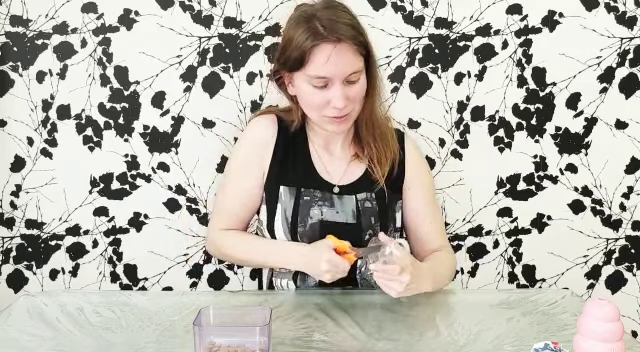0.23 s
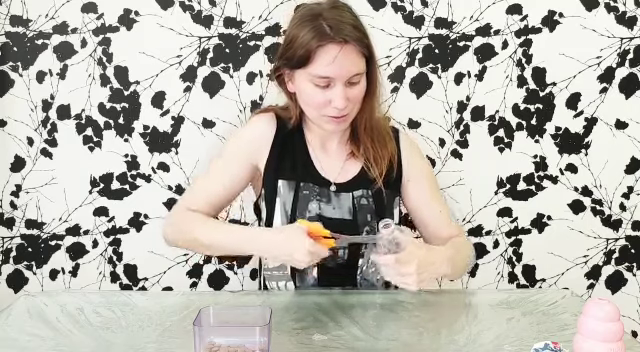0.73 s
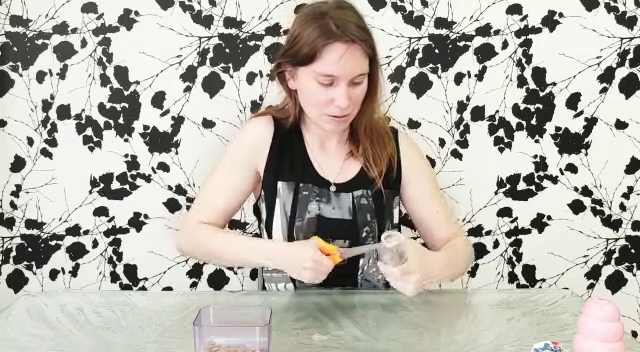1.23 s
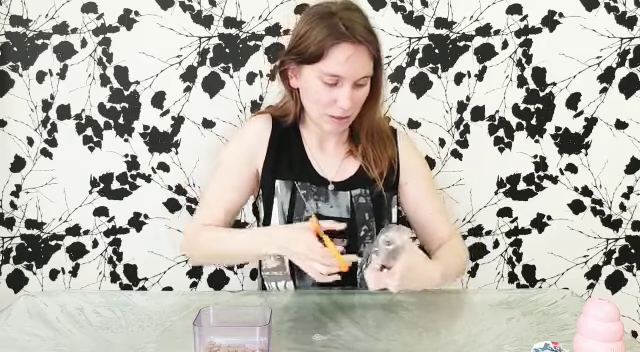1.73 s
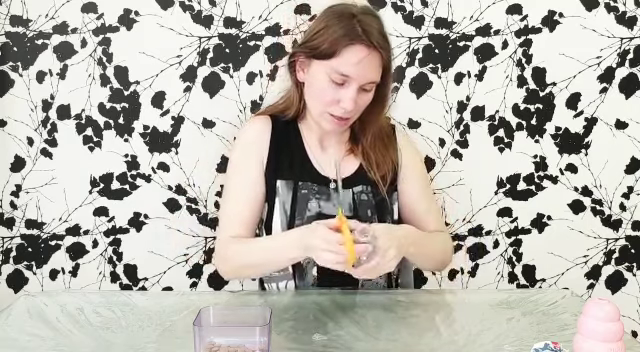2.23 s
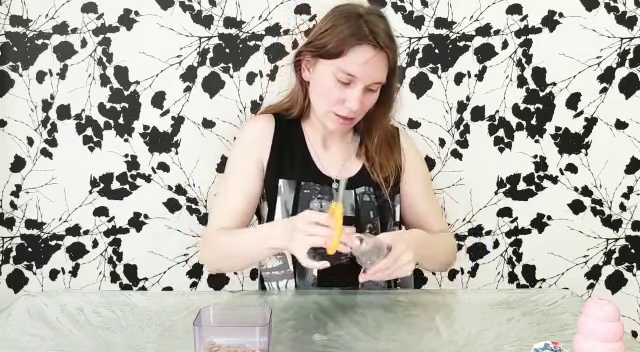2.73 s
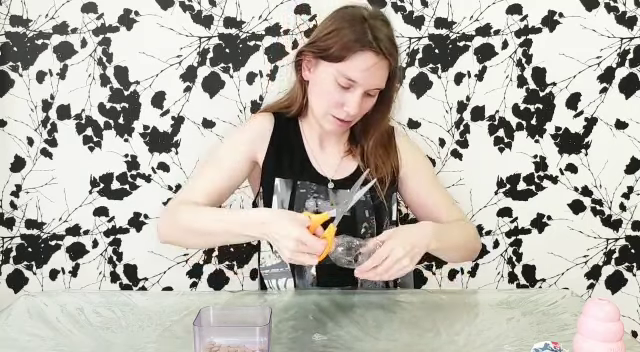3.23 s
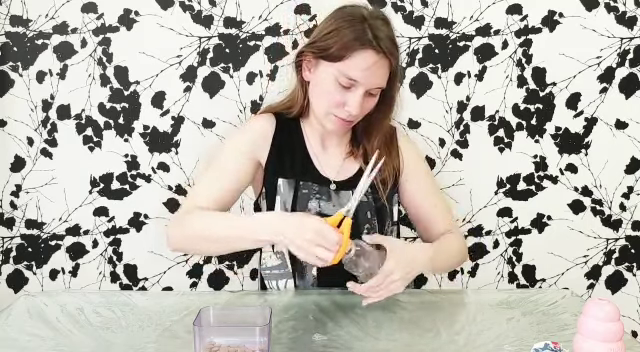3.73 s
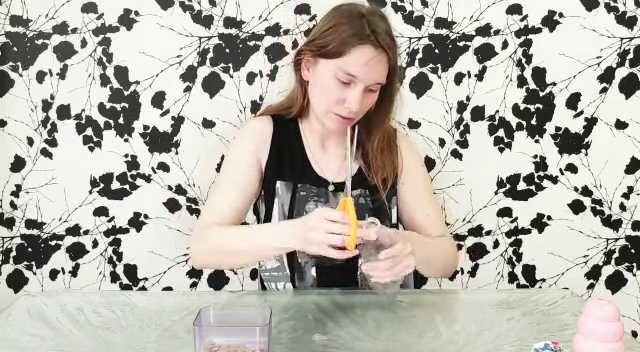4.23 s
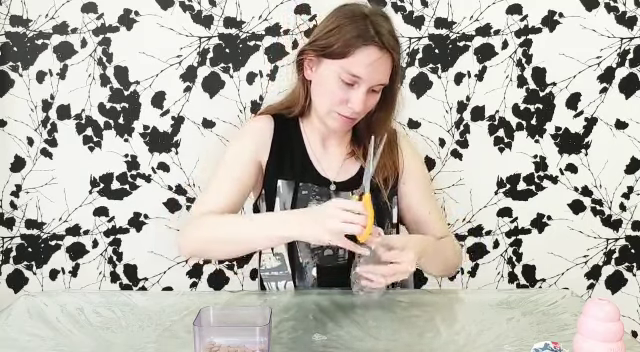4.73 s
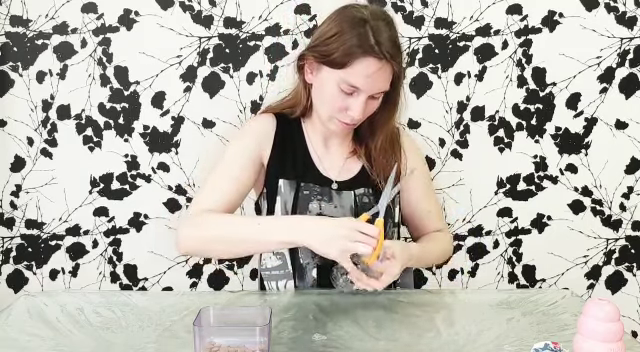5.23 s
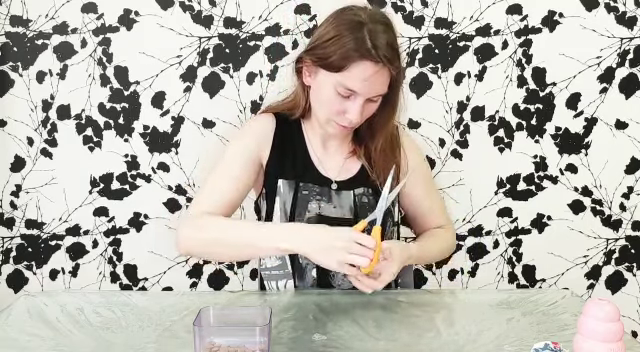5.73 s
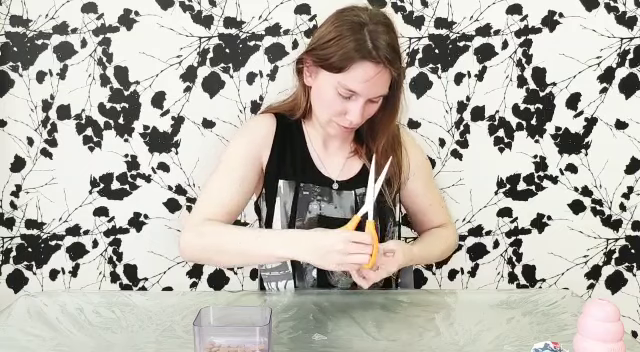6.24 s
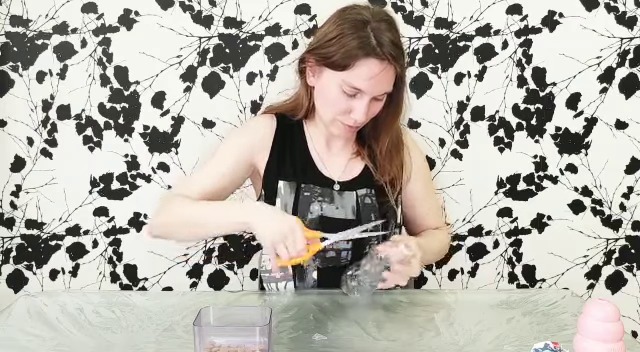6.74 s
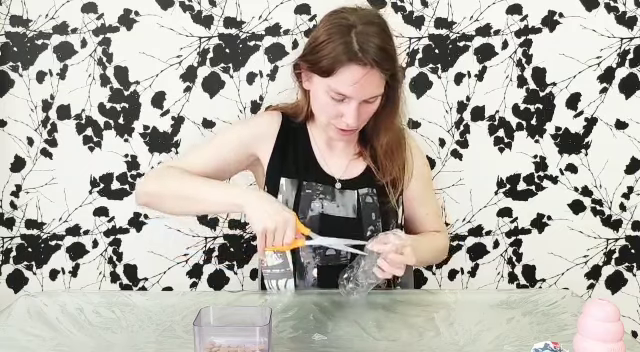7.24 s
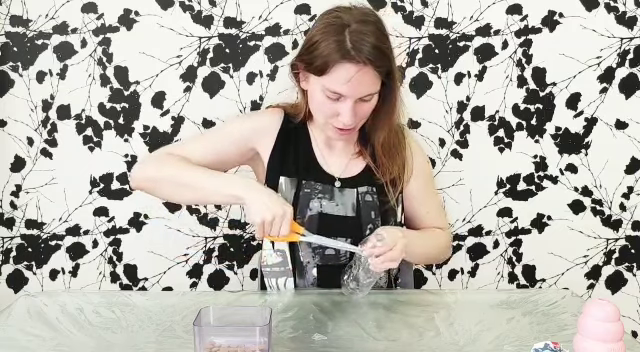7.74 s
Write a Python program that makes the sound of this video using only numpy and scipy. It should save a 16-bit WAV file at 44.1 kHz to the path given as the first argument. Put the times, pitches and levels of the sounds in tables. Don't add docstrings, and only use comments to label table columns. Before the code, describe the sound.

In a bare, hard room with faint air noise and low mains hum, scissors cut a thin plastic bottle close to a bright stereo microphone. From 0 to 1 second, fine crinkles and small dents lead into sharp snaps, with a strong panel click at 0.8. A hollow pop comes near 1.07, a hard snip at 1.5, then a lighter, quieter stretch. From 2.3 to 2.7 a dense cluster of cracks, splinters and pops bursts out. More snips follow at 2.95 and 3.3, then hollow buckling and short groaning slips around 3.4 to 3.6. Separate cracks sound near 4.1, 4.5 and 4.8, a deeper pop at 5.03, and snaps at 5.35 and 5.55. Crackling continues from 6 to 6.6, eases, then resumes at 7.3. A very loud, direct plastic pop hits at 7.5, followed by final snaps until 8. Each crack rings for about half a second.

```python
import sys
import numpy as np
from scipy import signal
from scipy.fft import rfft, irfft
from scipy.io import wavfile

SR = 44100
rng = np.random.default_rng(int(sys.argv[2]) if len(sys.argv) > 2 else 0)


def to_wav(sig):
    pcm = np.clip(np.atleast_2d(sig), -1, 1) * 32767
    pcm = np.round(pcm).astype(np.int16)
    wavfile.write(sys.argv[1], SR, pcm.T)


def gain_from_decibels(decibels):
    exponent = np.asarray(decibels, float) / 20
    return 10 ** exponent


N = 352359


def evened(x):
    return x / np.sqrt(np.mean(x ** 2) + 1e-20)


def peaked(x, db):
    return gain_from_decibels(db) * x / abs(x).max()


def read(points, hz):
    f, value = np.transpose(points)
    return np.interp(np.log(hz + 1), np.log(f + 1), value)


def add(mix, start_s, sound):
    part = mix[round(start_s * SR):][:len(sound)]
    part += sound[:len(part)]


def band(x, lo_hz, hi_hz):
    edges_hz = [lo_hz, min(hi_hz, SR / 2 - 500)]
    return signal.sosfilt(signal.butter(2, edges_hz, "bandpass", fs=SR, output="sos"), x)


def noise_pair(gain, same):
    a, b, c, d = rng.standard_normal(gain.shape[::-1] + (4,)).T
    same = np.clip(same, -1, 1)[:, None]
    left = a + 1j * b
    right = same * left + np.sqrt(1 - same ** 2) * (c + 1j * d)
    return signal.istft(np.array([left, right]) * gain, nperseg=512, noverlap=384)[1]


# pitch_hz, density_db (per Hz)
AIR = [(12, -14), (30, 4), (70, -4), (225, -9), (430, -4.5), (516, -31), (891, -8), (1220, -15.5),
       (2660, -21), (4830, -52), (7320, -19), (10000, -34), (13000, -31), (22000, -120)]
# pitch_hz, level_db, phase_rad
HUM = [
    (99.94, -64, 3.73),
    (98.5, -69, 4.39),
    (149.94, -71, 4.17),
    (199.86, -64, -.54),
]
# pitch_hz, likeness (0-1)
ROOM_SAME = [(60, 0.093), (180, 0.83), (550, 0.42), (1650, 0.056), (4970, 0.017), (15000, 0.015)]


def background():
    hz = np.fft.rfftfreq(512, 1 / SR)
    t = np.arange(N) / SR
    air_gain = gain_from_decibels(read(AIR, hz))[:, None] * np.ones(N // 128 + 5)
    air = noise_pair(air_gain, read(ROOM_SAME, hz))[:, :N]
    hum = sum(np.sqrt(2) * gain_from_decibels(db) * np.sin(2 * np.pi * f * t + phase) for f, db, phase in HUM)
    return gain_from_decibels(-51) * evened(air) + gain_from_decibels([[1.5], [-1.5]]) * hum


# start_s, level_db
CREASES = [(0, -33), (.7, -59), (2.0, -41.5), (2.28, -60), (2.33, -27), (2.649, -51), (3.45, -21),
           (3.85, -31.5), (4.09, -75), (4.9, -46), (5.3, -46), (6.3, -36), (7.0, -50), (7.3, -63),
           (7.6, -16), (7.99, -57)]


def creases():
    per_s, spread_db, cap_spreads = 300, 7, 2.2
    size = gain_from_decibels(spread_db * np.minimum(rng.exponential(1, N), cap_spreads))
    size *= rng.random(N) < per_s / SR
    ticking = evened(band(size * rng.choice([-1, 1], N), 910, 17000))
    start_s, level_db = np.transpose(CREASES)
    return gain_from_decibels(np.interp(np.arange(N) / SR, start_s, level_db) - 22) * ticking


# pitch_hz, t60_s
ROOM = [(200, 0.56), (600, 0.63), (1700, 0.53), (4500, 0.65), (9000, 0.49), (14000, 0.6)]
# delay_s, level_db
WALLS = [
    (.0021, -8),
    (.0068, -6),
    (.0105, -9),
    (.0155, -9),
]


def room(sends):
    hz = np.fft.rfftfreq(512, 1 / SR)
    t = np.arange(SR // 128) * 128 / SR
    out = np.zeros((2, N))
    for send in sends:
        tail = noise_pair(gain_from_decibels(-60 * t / read(ROOM, hz)[:, None]), read(ROOM_SAME, hz))
        tail *= 1 - np.exp(-(np.arange(tail.shape[1]) / SR / 0.0048) ** 2)
        tail *= gain_from_decibels(5.5) / np.linalg.norm(tail[0])
        for delay_s, db in WALLS:
            arrival = (delay_s * SR * rng.uniform(.9, 1.1, 2)).astype(int)
            tail[[0, 1], arrival] += gain_from_decibels(db) * rng.choice([-1, 1])
        out += signal.fftconvolve(send[None], tail, axes=1)[:, :N]
    return out


def tear(db, body_db):
    grit = rng.standard_normal(300)
    u = np.arange(len(grit)) / SR / 0.00069
    spectrum = rfft(grit * u * np.exp(-u), 512)
    crack = irfft(spectrum / abs(spectrum) ** 0.85)
    return peaked(band(crack, 6970, 23560), db - 9) + peaked(band(crack, 1240, 4330), db + body_db)


# start_s, peak_db, body_db (against the treble), send_db (to the room)
SPLINTERS = [(0.00104,-30,-8.5,8.5),(.088,-25,-6,-6),(2.3317,0,-8.5,-1),(2.349,0,-27,-7),(2.3648,4.5,-12.5,-3),(3,-5,-26.5,-2),
             (2.74,-7.5,-24,4.5),(5.0297,-6,-10,-5),(5.29,-44,-3,-5),(3.2,-20,-14,4),(2.5105,-2,-25,-7),(6.966,-32,1,1),(0.46,-14,-14,-3),
             (3.5215,2.5,-12.5,-8),(4.534,-3.5,-10,-11.5),(3.7305,-17,-10,-9),(2.7,-1,-22,-9),(3.6705,-13,-21,-6),(.9975,3.5,-16,-14),(4.5125,-10,-14,-7),(7.5035,-3,-10,-1),(5.9095,-22,-7.5,0),
             (0.4,-6,-18,-9),(2.471,-5,-18,-6),(2.497,4,-16,-6),(2.405,0,-14,2),(5.559,-7,-14,-6),(5.6045,-7,-14,-12),(5.624,-12,-14,-6),
             (4.1,-5,-17,-9),(6.4,-5,-14,-4),(3.4985,-4,-18,-10),(3.456,-9,-5,-5),(7.7,-8,-10,-6),(6.33,-5,-14,-11),(6.369,-14,-17,-10),(6.181,-28,6,-1),
             (4.6575,-6.5,-9,-5),(4.701,-21,5,-6),(.7995,-2,-13,-8)]


def splinters():
    return [(s, tear(db, body_db), send_db) for s, db, body_db, send_db in SPLINTERS]


def flip(db, hz, knock_db, thump_db):
    grit = rng.standard_normal(2000)
    t = np.arange(len(grit)) / SR
    push = 0.18 * grit * np.exp(-t / 0.0027)
    push[0] += 1
    spread = 1 + 1 / 9.5 + 150 / hz
    ring = band(push, hz / spread, hz * spread) * (1 - np.exp(-t / 0.0017))
    knock = band(push, 677, 2114)
    thump = band(band(push, 137, 490), 93, 520)
    return peaked(ring, db - 3.5) + peaked(knock, knock_db - 1) + peaked(thump, thump_db + 4.5)


# start_s, ring_db, pitch_hz, knock_db
DENTS = [(0.023,-32,1170,-33),(0.069,-29.5,1240,-35),(0.484,-49,1460,-28),(0.52,-23,1690,-36),(.743,-31.5,1210,-50),
         (1.129,-32,413,-38),(1.313,-23.5,2400,-41),(1.365,-25.5,990,-22),(1.493,-22.5,1040,-39),(1.955,-36,1660,-56),
         (2.037,-25,384,-28),(2.13,-34,961.5,-27),(2.202,-24,760,-20.5),(2.277,-42,1430,-17.5),(2.656,-16,1810,-17.5),
         (2.952,-26,860,-22),(3.727,-38,1450,-16.5),(3.988,-30.5,425,-40),(4.114,-37,1500,-55),(4.506,-30.5,970,-47),
         (4.766,-23,810,-14),(5.273,-28.5,1240,-31),(5.524,-12,1230,-12),(5.858,-30.5,1350,-50),(6.13,-46,1440,-17),
         (6.495,-24.5,780,-47),(7.175,-29,820,-60),(7.455,-24,836,-19.5),(7.664,-40,970,-17),(7.921,-14,1850,-26)]


def dents():
    return [(s, flip(db, hz, knock_db, max(db, knock_db) - 20), 3) for s, db, hz, knock_db in DENTS]


# start_s, peak_db, body_db (1.2-4.3 kHz against the treble), send_db
SNAPS = [(.0965,-5.5,-14.5,2),(.2946,-5,-17,1),(.417,0.5,-24,-1),(.4877,-4.5,-13.5,5),(.7934,2.5,-11,5),(.8066,-2.5,-11.5,10),
         (.9959,3.5,-16.5,4.5),(1.5112,8,-15,-0.5),(2.3082,7,-17,-1),(2.3929,2,-20,3),(2.46,6,-15.5,0.5),(2.5089,-1,-31,3.5),
         (2.6772,5,-15.5,-1.5),(2.6913,5,-21.5,1),(2.9516,6,-19,-0.5),(3.2984,7.5,-15,2.5),(3.497,-0.5,-17,4.5),(4.1305,3.5,-16,-2),
         (4.5333,0.5,-41,-2),(4.7664,2,-19.5,0),(5.3542,7.5,-17,1.2),(5.5439,3.5,-16,4),(5.9758,0.5,-20,0.5),(6.1897,2.5,-20,1),
         (6.2862,2.5,-37,-9),(6.5548,3.5,-64,-2),(7.328,1.5,-17,1.5),(7.503,2.5,-14,0.5),(7.7158,3,-46,0),(7.9245,4,-10,0)]


def snaps():
    return [(s, tear(db, body_db), send_db) for s, db, body_db, send_db in SNAPS]


# start_s, ring_db, pitch_hz, knock_db, thump_db
SHOULDER = [(.099,-26,1230,-18.5,-30.5),(0.239,-13.5,1400,-26,-73),(.282,-13.5,1450,-22,-68),(.326,-44,1500,-11.5,-47),
            (.808,0.5,1550,-12,-20.5),(1.644,-25,1260,-14.5,-31),(1.831,-34,1620,-16,-66),(2.306,-16,1740,-15,-26),(2.36,-32,1750,-9,-32),
            (2.395,-69,1310,-9,-25.5),(2.491,-14,1510,-18,-35),(2.692,-14,1810,-14,-23),(3.61,-31,1410,-10.5,-27),(3.765,-46,1500,-10.5,-23),
            (4.533,-11,2090,-13.5,-36.5),(4.658,-11.5,2450,-15.5,-25),(5.353,-39,1300,-32,-35),(5.975,-10.5,1420,-7,-62),(6.19,-30,1140,-14,-33),
            (6.286,-37,1250,-12.5,-37),(6.398,-17.5,1870,-17.5,-35),(6.567,-33,1340,-15.5,-48),(7.72,-4,1500,-16,-41),(7.971,-14,1220,-13,-27)]


def shoulder_pops():
    return [(row[0], flip(*row[1:]), 0.4) for row in SHOULDER]


# start_s, peak_db, body_db (against the treble)
TICKS = [(0.2388,-19.5,0),(0.7909,-5,-12),(0.945,-20.5,-14),(1.148,-14,-30),(1.478,-13.5,-13),(1.4976,-16,-16),
         (1.5306,3,-14),(1.622,-9,-27),(2.127,-20,-12),(2.206,-18.5,-22),(2.3016,-6.5,-5),(2.3854,-7,-9.5),(2.484,0,-14),
         (2.9013,-12.5,-9),(3.6703,-32.5,13.5),(3.7295,-31,3),(4.5085,-21,-22),(4.5675,-11.5,-9.5),(4.617,-20,-30),(5.5078,-7,-12.5),
         (5.908,-18,-30),(6.142,-8.5,-13),(6.326,-4.5,-27),(6.9633,-16.5,-20),(7.175,-22.5,-12.5),(7.3325,0.5,-58),(7.416,-10,-16),
         (7.457,-8.5,-8),(7.537,-4.5,-11),(7.6753,-8.5,-10)]


def ticks():
    return [(s, tear(db, body_db), 1) for s, db, body_db in TICKS]


# start_s, peak_db, body_db (against the treble),
# send_db
SOFT_SNAPS = [(0.3285,-4.5,-3,-5),(0.423,-5,-19.5,6),(0.568,-10,-10,-10),(1.0737,-6,-22,3.5),(1.314,-12.5,-8.5,7.5),
              (1.3626,-11.5,-9.5,2),(1.6405,-8.5,-11.5,7),(1.678,-43,-20,38.5),(2.2747,-1.5,-18,-6),(2.3624,-1,-20,-14),(2.6536,-5.5,-15,3.5),
              (2.7932,-8.5,-16,8),(3.222,-21,8.5,-8.5),(3.3945,-1,-8,1.5),(3.422,-4,-30,3.5),(3.54,-3,-17,-3),(3.581,-13,-2,3.5),
              (4.5049,-1,-14.5,-5),(4.664,-1,-12,.1),(4.9985,-8.5,-35,5),(5.03,-12.5,-32,1.5),(5.163,-9.5,-9,-1),(5.602,-13,-12.5,17.5),
              (5.6218,-8,-15,11.5),(6.298,2,-15,1),(6.3988,-8.5,-10.5,-4),(6.4949,-7,-12,3.5),(6.764,-9.5,-10.5,1),(7.741,-16,-4,3),(7.9178,-8,-19,1)]


def soft_snaps():
    return [(s, tear(db, body_db), send_db) for s, db, body_db, send_db in SOFT_SNAPS]


def groan(length_s, db, first_hz, last_hz):
    rise_s, jerks_per_s, ring_q = 0.0017, 900, 4.8
    chance, size = rng.random((2, 6000))
    t = np.arange(len(size)) / SR
    jerks = (chance < jerks_per_s / SR) * (size - .5) + 0.043 * (size - .5)
    jerks *= np.minimum(t / rise_s, 1) * np.clip((length_s + rise_s - t) / rise_s, 0, 1)
    jerks *= gain_from_decibels(-8.5 * t / length_s)
    pitch_hz = np.interp(t, [0, length_s], [first_hz, last_hz])
    turn = np.exp(2j * np.pi * np.cumsum(pitch_hz) / SR)
    r = np.exp(-np.pi * first_hz / ring_q / SR)
    ring = (turn * signal.lfilter([1], np.poly([r, r]), jerks / turn)).real
    return gain_from_decibels(db) * evened(ring) * np.sqrt(length_s / t[-1])


# start_s, length_s, level_db, first_hz, last_hz
GROANS = [(.796,0.035,-23,980,1050),(1.619,0.096,-30,930,950),(1.661,0.075,-31,1360,1340),(2.029,0.031,-38,1680,1300),(2.208,0.05,-39,920,856),
          (2.476,0.018,-25.5,1800,1884),(3.396,.04,-20,920,846),(3.398,0.062,-21,630,540),(3.401,0.012,-27,1950,2000),(3.444,0.033,-21,1070,1030),(3.521,0.066,-26,850,910),
          (3.587,0.055,-26.5,1170,1600),(5.029,0.012,-16,450,450),(5.031,0.032,-23,910,760),(5.027,0.034,-25,1520,1470),(5.355,0.055,-35.5,874,795),(5.356,0.0082,-30,1350,1290),(6.286,0.015,-25,470,435),(6.287,0.011,-26.5,1420,1350),
          (6.3,.012,-31,1350,1416),(6.303,0.049,-28.5,695,680),(6.396,0.0366,-31,674,720),(6.493,0.026,-37,740,696),(6.561,0.011,-26,1320,1290),
          (6.971,0.017,-28.5,710,660),(7.329,0.056,-36,810,760),(7.967,0.019,-27.5,653,644),
          (1.07,0.027,-26,1350,1300),(0.74,0.015,-43,1680,845),(6.962,0.026,-34,1360,1340),(5.974,0.0085,-13,1450,1400),(7.002,0.054,-39,710,690),
          (0.806,.03,-24,2820,2720),(3.821,0.034,-35,400,367),(2.348,0.053,-33.5,594,630),
          (7.486,0.013,-17,1470,1120),(6.401,0.023,-31,2310,2720),(6.964,0.018,-36.5,2700,2530),(7.33,.03,-33,2150,2100),(3.397,0.041,-21.5,427,424)]


def groans():
    return [(row[0], groan(*row[1:]), -7) for row in GROANS]


# start_s, ring_db, pitch_hz, knock_db, thump_db
BELLY = [(.78,-27,1010,-28,-29),(.794,-33,1060,-14,-19.5),(.997,-24,910,-12,-24.5),(1.074,-4.5,427,-9.5,-15),(1.094,-13,960,-34,-34),
         (1.513,-6.5,1090,-47,-27.5),(1.614,-43,980,-15.5,-47),(2.455,-25,1110,-13,-20.5),(2.899,-17.5,365,-21,-49),(3.051,-46,895,-15,-26.5),
         (3.221,-14,935,-12,-28),(3.258,-14,335,-15.5,-25),(3.396,-5.5,720,-3,-17.5),(3.521,-10.5,855,-9,-32),(3.819,-13.5,910,-28,-28.5),
         (4.1315,-40,1030,-14,-60),(4.858,-12,840,-23,-31),(5.002,-12,423,-16,-21),(5.03,-8,510,-9.5,-29),(5.542,-4.5,885,-44,-25.5),
         (6.329,-22.5,690,-30,-53),(6.964,-18,790,-18.5,-30.5),(7.329,-21,800,-15.5,-34)]


def belly_pops():
    return [(row[0], flip(*row[1:]), 1.48) for row in BELLY]


# start_s, ring_db, pitch_hz, knock_db, thump_db
FACING = [
    (7.4847, 5.9, 960, 0.67, -26),
]


def facing_pop():
    return [(row[0], flip(*row[1:]), -5.5) for row in FACING]


def causal(db):
    log_gain = np.log(gain_from_decibels(np.r_[db, db[-2:0:-1]]))
    return np.fft.ifft(np.exp(log_gain - 1j * signal.hilbert(log_gain).imag)).real[:1024]


# pitch_hz, gain_db
MIC = [(30, -36), (110, -26.5), (250, -15.5), (500, -4), (2000, -0.5), (3500, -0.5), (5500, 6.5),
       (9500, -2), (10500, -11), (12000, -11), (16000, -23)]
# pitch_hz, width_hz, lift_db, bass_db
PORTS = [
    (8604, 1750, 18.5, 3),
    (7573, 2020, 19.5, -1),
]


def ports(x):
    hz = np.fft.rfftfreq(4096, 1 / SR)
    out = []
    for channel, (f, width_hz, lift_db, bass_db) in zip(x, PORTS):
        lift = lift_db / (1 + (2 * (hz - f) / width_hz) ** 2)
        bass = bass_db / (1 + (hz / 1500) ** 2)
        out.append(signal.oaconvolve(channel, causal(read(MIC, hz) + lift + bass))[:N])
    return np.array(out)


# start_s, left_right_db
SIDEWAYS = [(0.0, -2.0), (0.93, -1.0), (1.02, 5.0), (1.16, 0.0), (5.3, -1.5), (5.34, 2.5), (6.79, -3.5),
            (7.1, -0.5), (7.41, -3.5), (7.54, 5), (7.7, -4.5), (7.99, -0.5)]


def carried(x):
    side_db = np.interp(np.arange(N) / SR, *np.transpose(SIDEWAYS)) / 2 + .4
    return gain_from_decibels(np.array([side_db, -side_db])) * x


def bending():
    direct, send = np.zeros((2, N))
    for start_s, sound, send_db in groans() + splinters():
        add(direct, start_s, sound)
        add(send, start_s, gain_from_decibels(send_db) * sound)
    return direct + room(send[None])


def scene():
    direct = creases()
    sends = np.zeros((3, N))
    sends[0] += direct
    events = snaps() + soft_snaps() + ticks()
    events += belly_pops() + facing_pop() + shoulder_pops() + dents()
    for k, (start_s, sound, send_db) in enumerate(events):
        add(direct, start_s, sound)
        add(sends[k % 3], start_s, gain_from_decibels(send_db) * sound)
    bottle = direct + room(sends) + bending()
    return carried(ports(bottle)) + background()


def top_cut(x):
    return signal.sosfilt(signal.butter(12, 16310, fs=SR, output="sos"), x)


def record(dry):
    ceiling = gain_from_decibels(-.3)
    return top_cut(np.clip(dry, -ceiling, ceiling))


dry = scene()
out = record(dry)
to_wav(out)
```